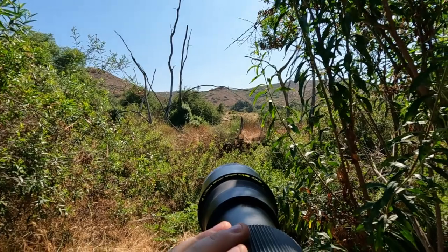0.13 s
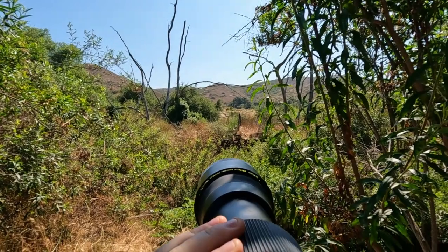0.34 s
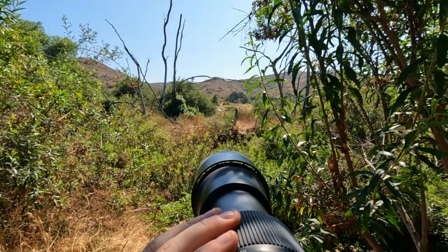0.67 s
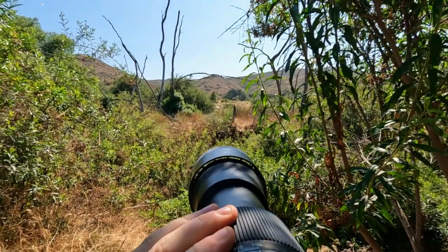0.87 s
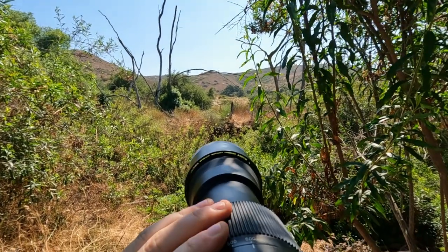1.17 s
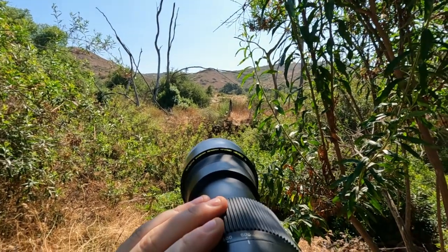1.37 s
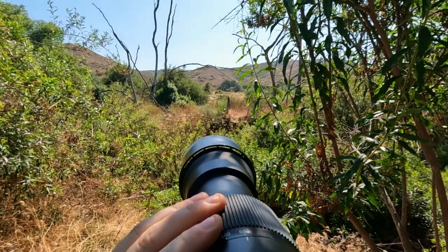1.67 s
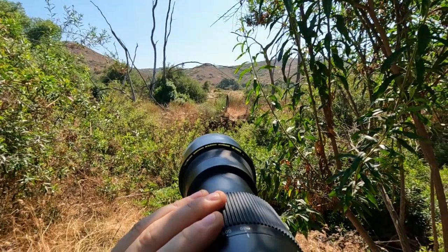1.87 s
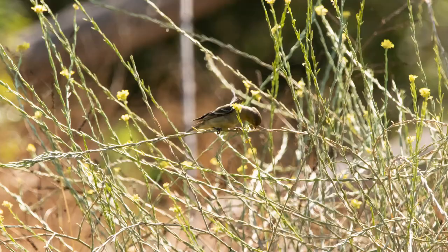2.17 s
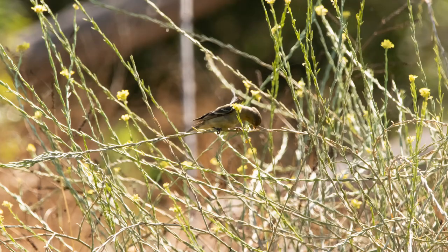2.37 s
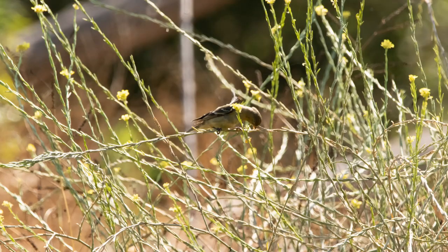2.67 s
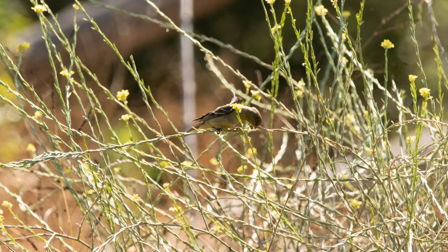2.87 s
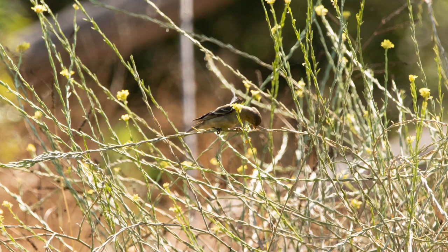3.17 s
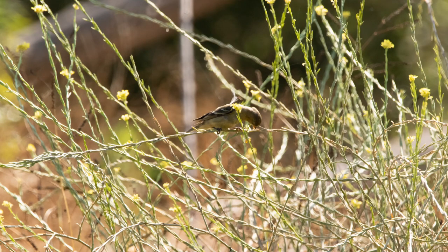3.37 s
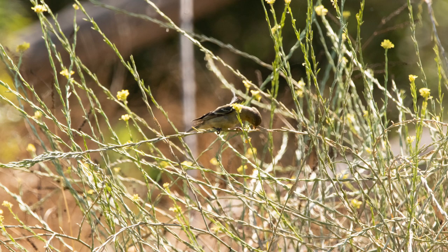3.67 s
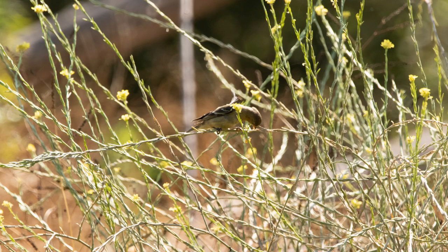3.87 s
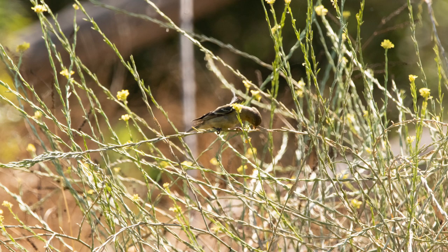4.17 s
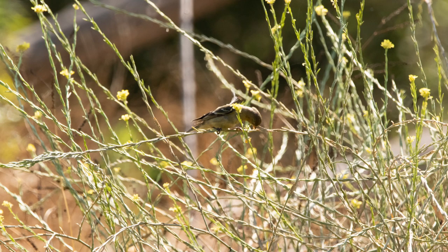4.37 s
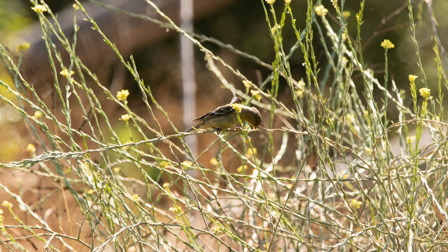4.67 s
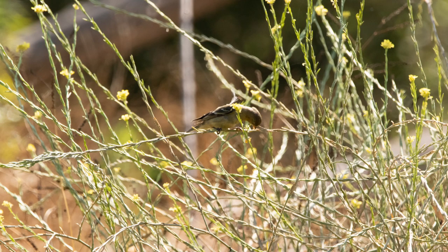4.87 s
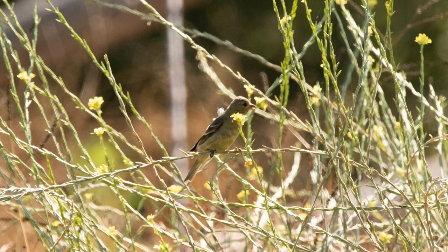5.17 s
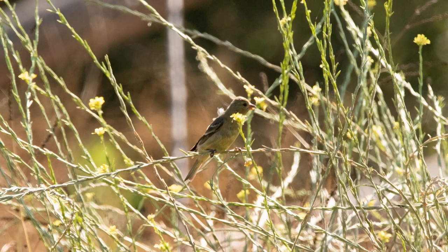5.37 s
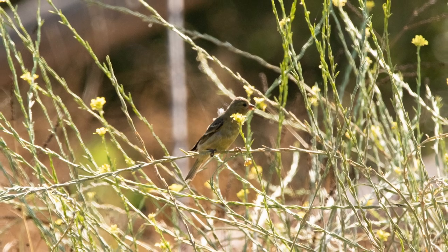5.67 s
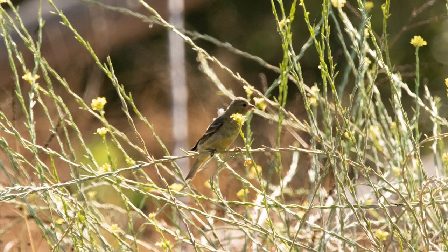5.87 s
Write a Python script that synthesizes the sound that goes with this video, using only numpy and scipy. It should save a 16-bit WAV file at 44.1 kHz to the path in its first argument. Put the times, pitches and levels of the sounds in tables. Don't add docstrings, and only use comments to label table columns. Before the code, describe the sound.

An open-air scene in dry scrub, heard from a small stereo microphone right beside a camera. Quiet low traffic rumble and wavering engine hum run throughout, with barely audible air and insect hiss. From 0 seconds small birds give harsh wheezes, falling whistles and chips at a distance, softened by the foliage. Fingers rub and tap the grip, with a firmer knock at 0.54 and tiny touches around 1.1 and 1.7. At 2.04 a button ticks, a latch snaps at 2.08, and from 2.12 to 2.25 the mirror, shutter blades and recocking gears clatter in a loud, tight metallic burst. The button returns softly at 2.6. Birds scold at 3.2 to 3.8 and one buzzes at 4.2. The second shot snaps at 4.81 and clatters from 4.88 to 5.02, followed by a small button click at 5.3 and more chirps until 6 seconds.

```python
import sys
import numpy as np
from scipy import signal
from scipy.fft import rfft, irfft
from scipy.io import wavfile

SR = 44100
rng = np.random.default_rng(int(sys.argv[2]) if len(sys.argv) > 2 else 0)


def store_wav(level_fs):
    pcm = np.round(np.clip(np.atleast_2d(level_fs), -1, 1) * 32767)
    wavfile.write(sys.argv[1], SR, pcm.T.astype(np.int16))


def elevation(decibels):
    levels = np.asarray(decibels, float)
    return 10 ** (levels / 20)


N = 265526

# t/s, peak level/dB
LATCH = [
    (2.0831, -10),
    (4.8143, -11.5),
]


def rms_one(x):
    return x / np.sqrt(np.mean(x ** 2) + 1e-20)


def in_time(rows):
    s, *columns = np.transpose(rows)
    return [np.interp(np.arange(N) / SR, s, c) for c in columns]


def at_hz(points, size):
    hz = np.maximum(np.arange(size // 2 + 1) * SR / size, 1)
    table_hz, value = np.array(points).T
    return np.interp(np.log(hz), np.log(table_hz), value)


def drift(rate_hz, size):
    r, run_in = np.exp(-2 * np.pi * rate_hz / SR), 8000
    noise = rng.standard_normal(size + run_in)
    return rms_one(signal.lfilter([1], [1, -2 * r, r * r], noise)[run_in:])


def pan(x, db):
    return x * elevation(np.array([db / 2, -db / 2])).reshape(2, -1)


def ring(x, hz, t60_s):
    r, w = elevation(-60 / (t60_s * SR)), 2 * np.pi * hz / SR
    return signal.lfilter([0, np.sin(w)], [1, -2 * r * np.cos(w), r * r], x + 1e-18)


def causal(points, size):
    cepstrum = irfft(np.log(elevation(np.maximum(at_hz(points, size), -80))), size)
    cepstrum[1:size // 2] *= 2
    cepstrum[size // 2:] = 0
    return irfft(np.exp(rfft(cepstrum)), size)[:size // 2]


def scrub(x, t60_s, wet_db):
    t = np.arange(round(.4 * SR)) / SR
    tail = rng.standard_normal((2, len(t))) * elevation(-60 * t / t60_s) * (t > .003)
    tail = elevation(wet_db) * tail / np.sqrt(np.sum(tail ** 2) / 2)
    return x + signal.fftconvolve(x * np.ones((2, 1)), tail, axes=1)[:, :N]


def far_noise(spectrum):
    # f/Hz, left-right likeness
    likeness = [(60, 0.97), (130, 0.98), (290, 0.91), (640, 0.6), (1410, 0.41), (3100, 0.17), (6820, 0.4),
                (15000, 0.76)]
    # f/Hz, left minus right level/dB
    lean = [(60, 1), (150, 0.5), (380, 0.5), (950, 4.5), (2380, 2), (5980, -0.5), (15000, 7)]
    alike = np.clip(at_hz(likeness, N), 0, 1)
    mid, side = rfft(rng.standard_normal((2, N))) * elevation(at_hz(spectrum, N))
    both = np.sqrt(1 + alike) * mid + np.sqrt(1 - alike) * side * [[1], [-1]]
    return rms_one(irfft(pan(both, at_hz(lean, N)), N))


def heavy_rumble():
    # t/s, level/dB, left minus right/dB
    swell = [(0.0, -39, -1.5), (0.3, -40.5, -4), (2.09, -39.5, 0.0), (2.43, -43, -3), (4.44, -40.5, -1.7),
             (5.75, -41, -1.5), (6.02, -37.5, -2.5)]
    # f/Hz, density/dB per Hz
    colour = [(7.1, -31.5), (12, -1), (38, 7.5), (54, 5), (92, -7), (130, -20), (170, -41), (290, -120)]
    level_db, lean_db = in_time(swell)
    return pan(elevation(level_db + 1.5 * drift(11.0, N)) * far_noise(colour), lean_db)


def traffic_noise():
    # f/Hz, density/dB per Hz
    colour = [(53, -34), (90, -1.5), (147, -6), (192, -8), (244, -6), (348, -15.5), (441, -16.5),
              (553, -20), (820, -26.5), (1040, -24.5), (1300, -25.5), (2050, -34.5), (2450, -44.5),
              (3380, -75.5), (5720, -120)]
    return elevation(-49.5) * far_noise(colour)


def insect_hiss():
    # f/Hz, density/dB per Hz
    colour = [(1290, -38), (2200, -11), (2910, -8), (3160, -4.5), (3410, -11), (3820, -9.5), (5020, -8.5),
              (6540, -8), (8300, -18), (9300, -12.5), (10300, -3.5), (11200, -15), (14100, -22.5),
              (15800, -37)]
    return elevation(-75.5 + .8 * drift(8, N)) * far_noise(colour)


def insects():
    # f/Hz, level/dB, t60/s
    singers = [(10700, -94, 0.024), (9490, -99, .03), (10600, -100, .03)]
    noise = rng.standard_normal((2, N))
    return sum(elevation(db) * rms_one(ring(noise, hz, t60_s)) for hz, db, t60_s in singers)


def tone(hz, db, wobble_db):
    level = elevation(db + wobble_db * drift(6.5, N))
    return np.sqrt(2) * level * np.sin(2 * np.pi * np.cumsum(hz) / SR)


def near_engine():
    # t/s, f/Hz, level/dB, second multiple/dB, third multiple/dB
    hum = [(0.0, 141.2, -50, -59, -63.5), (1.32, 145.8, -49, -74, -75), (5.58, 145.7, -50.5, -66.5, -66),
           (6.02, 143.3, -50.5, -83, -95)]
    hz, db, second_db, third_db = in_time(hum)
    return tone(hz, db, 2.0) + tone(2 * hz, second_db, 3.3) + tone(3 * hz, third_db, 1.2)


def passing_engine():
    # t/s, second multiple f/Hz, its level/dB, fundamental/dB, third multiple/dB
    drone = [(0.0, 239.9, -56, -77, -85), (0.75, 243.4, -65, -64, -85), (4.07, 242.5, -51, -49, -61),
             (6.02, 232.5, -55, -49, -73.5)]
    hz, db, first_db, third_db = in_time(drone)
    return tone(hz, db, 0.88) + tone(hz / 2, first_db, 1.9) + tone(hz * 3 / 2, third_db, 1.5)


def brief_engine():
    # t/s, f/Hz, level/dB
    whine = [
        (4.1, 259.5, -56),
        (4.696, 270.5, -53),
        (5.2, 261.2, -59.5),
    ]
    (first_s, first_hz, _), (last_s, last_hz, _) = whine[0], whine[-1]
    hz, db = in_time([(first_s - .2, first_hz, -90)] + whine + [(last_s + 0.18, last_hz, -90)])
    return tone(hz, db, 3.6)


def call_rows(rows, waver_hz, octaves_per_s=0):
    full = []
    for s, length_s, hz, *end, db in rows:
        end_hz = end[0] if end else hz * 2 ** (octaves_per_s * length_s)
        full.append((s, length_s, hz, end_hz, db, waver_hz))
    return full


def birds(rows, even, waver_rate_hz, throb_db, edge):
    out = np.zeros(N + SR)
    for s, length_s, start_hz, end_hz, db, waver_hz in rows:
        u = np.linspace(0, 1, round(length_s * SR))
        regular = np.sqrt(2) * np.sin(2 * np.pi * waver_rate_hz * length_s * u)
        chance = 2.1 * np.tanh(0.64 * drift(waver_rate_hz, len(u)))
        waver = even * regular + (1 - even) * chance
        hz = start_hz * (end_hz / start_hz) ** u + waver_hz * waver
        shape = np.sin(np.pi * u ** 0.69) ** edge * elevation(db + throb_db * drift(60, len(u)))
        at = round(s * SR)
        out[at:at + len(u)] += np.sqrt(2) * shape * np.sin(2 * np.pi * np.cumsum(hz) / SR)
    return out[:N]


def clear_notes():
    # t/s, length/s, start f/Hz, level/dB
    slurs = [(.10, .04, 8200, -72), (.168, 0.044, 5500, -66), (.335, 0.055, 8200, -75),
             (.392, .05, 5680, -66), (.415, 0.034, 3200, -68), (.875, 0.019, 5400, -71),
             (.975, 0.02, 5370, -69), (1.28, 0.027, 6000, -66.5), (2.36, 0.014, 4540, -70),
             (3.98, 0.039, 3790, -75.5)]
    # t/s, length/s, f/Hz, level/dB
    pipes = [(.78, 0.097, 6600, -83.5), (1.17, .04, 6100, -80), (1.4, 0.054, 6500, -79),
             (1.48, .05, 5150, -74), (2.93, .11, 6000, -81), (2.95, .089, 4790, -81),
             (4.61, .1, 6270, -81.5), (5.33, .04, 4480, -68), (5.37, .1, 4470, -76.5),
             (5.335, 0.04, 5720, -78), (5.44, .073, 5680, -76)]
    # t/s, length/s, start f/Hz, end f/Hz, level/dB
    bends = [(.345, .025, 2700, 3300, -74), (.755, .045, 5000, 5550, -81), (.8, .05, 5500, 5450, -82),
             (1.17, .1, 4850, 4200, -77), (1.335, .05, 4250, 5000, -68), (1.36, .05, 6100, 6550, -80),
             (1.38, .05, 5000, 5200, -69), (2.755, .05, 2250, 3100, -73), (2.905, .03, 3200, 3900, -73),
             (2.905, .045, 4200, 4800, -72), (2.935, .025, 3900, 3350, -72), (3.25, .13, 4830, 4380, -76),
             (5.34, .03, 4450, 3700, -71)]
    rows = call_rows(slurs, waver_hz=50.4, octaves_per_s=-8.5)
    rows += call_rows(pipes, waver_hz=35) + call_rows(bends, waver_hz=50)
    return birds(rows, even=0, waver_rate_hz=160, throb_db=4.5, edge=0.25)


def husky_chips():
    # t/s, length/s, f/Hz, level/dB
    chips = [(.335, 0.146, 3840, -66), (1.27, .047, 3110, -79), (1.37, .025, 3100, -80),
             (1.5, 0.053, 3120, -81), (1.94, .018, 4380, -81), (2.38, 0.05, 3770, -65.5),
             (2.43, .17, 3890, -77), (3.55, 0.032, 6500, -69), (3.685, .027, 5120, -62.5),
             (3.805, 0.017, 2950, -65), (4.035, 0.027, 3790, -73), (4.02, 0.1, 5100, -77),
             (5.1, 0.055, 4830, -71.5), (5.64, .12, 3650, -70)]
    return birds(call_rows(chips, waver_hz=150), even=0, waver_rate_hz=600, throb_db=4.0, edge=.35)


def harsh_calls():
    # t/s, length/s, f/Hz, level/dB
    chats = [(0.0, 0.21, 5950, -75), (.58, 0.1, 5140, -70), (1.255, 0.083, 4190, -65.5),
             (1.35, 0.072, 3980, -63.5), (1.49, 0.042, 3980, -63), (3.245, 0.076, 5130, -68.5),
             (3.34, 0.053, 4390, -63), (3.52, 0.082, 5190, -65), (3.65, 0.087, 4860, -63.5),
             (3.74, 0.038, 5500, -68.5), (4.58, 0.09, 6250, -74.5)]
    # t/s, length/s, start f/Hz, end f/Hz, level/dB
    wheezes = [(.02, 0.31, 4860, 4010, -69), (2.62, 0.024, 3020, 2730, -69.5),
               (2.69, 0.059, 3480, 4180, -74.5), (2.74, 0.23, 5090, 3610, -65.5),
               (4.2, .31, 5820, 5680, -75.5), (5.1, 0.24, 5300, 5870, -79), (5.2, 0.2, 3810, 4280, -71),
               (5.35, 0.105, 3950, 3770, -68), (5.5, .13, 3810, 4160, -67), (5.5, .18, 5350, 4990, -83),
               (5.62, .12, 4036, 3514, -64.5)]
    # t/s, length/s, f/Hz, level/dB
    croak = [(0.0, .087, 2035, -63)]
    rows = call_rows(chats, waver_hz=1090) + call_rows(wheezes, waver_hz=482) + call_rows(croak, waver_hz=300)
    return birds(rows, even=0, waver_rate_hz=1226, throb_db=2.5, edge=0.31)


def even_buzz():
    # t/s, length/s, start f/Hz, end f/Hz, level/dB
    buzz = [(4.185, 0.3, 4490, 4255, -62)]
    return birds(call_rows(buzz, waver_hz=567), even=.7, waver_rate_hz=240, throb_db=2.0, edge=.45)


def birds_in_scrub():
    song = clear_notes() + husky_chips() + harsh_calls() + even_buzz()
    return elevation(-1.5) * scrub(pan(song, 0.53), t60_s=0.33, wet_db=0.5)


def chatter(size, per_s, spread_db):
    sizes = elevation(spread_db * np.minimum(rng.exponential(1, size), 4)) * rng.choice([-1, 1], size)
    return rms_one(sizes * (rng.random(size) < per_s / SR))


def contacts(size, per_s, spread_db, apart):
    shared, own = chatter(size, per_s, spread_db), chatter(size, per_s, spread_db)
    return shared + apart * np.array([.7, 1.0, 1.1])[:, None, None] * np.outer([1, -1], own)


def each_shot(rows):
    shots = [
        2.182,
        4.9455,
    ]
    return [[(shot + s, *rest) for s, *rest in rows] for shot in shots]


def rattle(moves, per_s, low_db, high_db, apart):
    level = 0
    for rows in moves:
        start, end = (rows[0][0] - .001, -120), (rows[-1][0] + .01, -120)
        level = level + elevation(in_time([start] + rows + [end])[0])
    tilt = elevation(np.array([low_db, 0, high_db]))[:, None, None]
    return level * elevation(1.3 * drift(160, N)) * tilt * contacts(N, per_s, 3.8, apart)


def grip_rub():
    # t/s, swell/s, fade/s, top level/dB
    rubs = [(0.0, 0.0049, 0.18, -67.5), (0.372, 0.19, 0.058, -63.5), (1.071, 0.11, .05, -74.5),
            (1.66, 0.027, 0.12, -71.5)]
    edge_db = -17.5
    moves = [[(s, db + edge_db), (s + swell_s, db), (s + swell_s + fade_s, db + edge_db)]
             for s, swell_s, fade_s, db in rubs]
    return rattle(moves, per_s=2500, low_db=18.5, high_db=-3.5, apart=0.44)


def gear_train():
    gear_run = [(-.069, -66.5), (-.060, -35), (-.031, -32), (-.015, -44), (-.006, -48), (0.0, -31),
                (.028, -35.5), (.053, -29.5), (.088, -67)]
    return rattle(each_shot(gear_run), per_s=8200, low_db=-2.5, high_db=-4.5, apart=0.39)


def camera(knocks, trim_db, part_db, part_t60_s, rise_s, apart, first):
    t = np.arange(round(.08 * SR)) / SR
    drive = np.zeros((3, 2, N + SR))
    for s, db, low_db, high_db, t60_s, part_hz in knocks:
        range_db = np.array([[low_db + 18], [0], [high_db + 14]])
        range_t60_s = t60_s * np.array([[1.4], [1], [.8]])
        tilt = elevation(db + trim_db + range_db - 60 * t / range_t60_s)
        layers = contacts(len(t), 16000, 1.5, apart) * (tilt * (1 - np.exp(-t / rise_s)))[:, None]
        layers[:, :, 0] = first * tilt[:, :1]
        layers[1:] += elevation(part_db) * ring(layers[1], part_hz, part_t60_s)
        at = round(s * SR)
        drive[:, :, at:at + len(t)] += layers
    return drive[:, :, :N]


def grip_touches():
    # t/s, peak level/dB, lows re mid/dB, highs re mid/dB
    handling = [(0.1516, -37, -16, -10.5), (0.1756, -39, -6, -17), (0.39, -39, 5, 1.5),
                (0.431, -45, 1, 7.5), (0.4728, -52, 7, -8), (0.511, -35.5, -1, -8),
                (0.5433, -26, 0.5, -3.5), (0.565, -48, -4, -6), (0.59, -50.5, 9.5, -17),
                (0.9862, -57, 10, -19), (1.085, -59, 12, 10), (1.098, -59, 14, -12),
                (1.133, -58.5, 14.5, -4), (1.1645, -43.5, 6, 0.5), (1.192, -56.5, 13.5, -13),
                (1.203, -53, 10, -7), (1.4403, -54.5, 10.5, -10), (1.667, -60, 16, -15),
                (1.6752, -52, 15, 13.5), (1.698, -53, 10, 4), (1.7138, -59, 16, -15), (1.726, -52, -1, -4),
                (5.2071, -56, 10.5, -14), (5.69, -52.5, 6.5, -26)]
    grip_t60_s, grip_hz = 0.022, 1000
    knocks = [(*row, grip_t60_s, grip_hz) for row in handling]
    return camera(knocks, trim_db=-15.5, part_db=-27.0, part_t60_s=0.01, rise_s=0.00067, apart=0.3, first=2.4)


def button_knocks():
    # t/s, peak level/dB, lows re mid/dB, highs re mid/dB, ringing part f/Hz
    presses = [(2.042, -23.5, -14, -16.5, 2410), (2.596, -39.5, -1, -34, 2330),
               (5.308, -33.5, -5, -12, 2590)]
    t60_s = .016
    knocks = [(s, db, low_db, high_db, t60_s, hz) for s, db, low_db, high_db, hz in presses]
    return camera(knocks, trim_db=-10.5, part_db=-20.5, part_t60_s=0.0061, rise_s=.0002, apart=.25, first=2.5)


def latch_knocks():
    snap_sound, bounce_sound = (-19, -11, 0.0151, 5250), (-12, -25, .028, 3000)
    pawl_lead_s, pawl_db = .0104, -45
    bounce_delay_s, bounce_db = .004, -19
    knocks = []
    for s, db in LATCH:
        knocks.append((s - pawl_lead_s, pawl_db, *snap_sound))
        knocks.append((s, db, *snap_sound))
        knocks.append((s + bounce_delay_s, db + bounce_db, *bounce_sound))
    return camera(knocks, trim_db=-14.5, part_db=-20, part_t60_s=0.0038, rise_s=.0001, apart=.25, first=.1)


def cycle_knocks():
    # t/s, peak level/dB, highs re mid/dB, chatter t60/s, ringing part f/Hz
    first_shot = [(2.1172, -11.5, -20, 0.024, 2100), (2.1235, -15, -8, 0.033, 2200),
                  (2.138, -20, -10, 0.031, 3200), (2.1488, -10, -8, .025, 3310),
                  (2.158, -18, -10, 0.026, 2300), (2.178, -21, -3, 0.067, 7000),
                  (2.183, -6.5, -5, 0.019, 2100), (2.188, -15, -12, .012, 2100),
                  (2.194, -15, -9, 0.017, 3700), (2.2, -17, -8, 0.023, 4300),
                  (2.2121, -10, -6.5, 0.029, 3750), (2.219, -12, -8.5, 0.02, 2000),
                  (2.2262, -15, -8, .025, 3000), (2.234, -18.5, -8, 0.022, 6900),
                  (2.243, -20.5, -14, .02, 1830), (2.249, -24, -22.5, 0.041, 2400)]
    second_shot = [(4.884, -23, -11, .04, 3350), (4.889, -15, -10, .02, 3420), (4.899, -19, -12, .03, 3300),
                   (4.9127, -10.5, -10, .022, 3400), (4.92, -16, -8, 0.027, 2290),
                   (4.929, -22.5, -10.5, 0.0097, 1900), (4.941, -22, -3, .06, 7100),
                   (4.946, -7.5, -4.5, .018, 2194), (4.957, -14, -8, .018, 3700),
                   (4.963, -18, -8, .025, 4300), (4.9753, -11, -7, .035, 3410),
                   (4.9813, -13, -5.5, 0.018, 6870), (4.99, -13.5, -10, .025, 3300),
                   (4.996, -15, -12, .018, 3400), (5.004, -19.5, -14, .025, 2200),
                   (5.012, -23.5, -18.5, .025, 2400)]
    low_db = -20.5
    knocks = [(s, db, low_db, *rest) for s, db, *rest in first_shot + second_shot]
    return camera(knocks, trim_db=-10.5, part_db=-23.5, part_t60_s=0.009, rise_s=0.0006, apart=.2, first=.1)


def strikes():
    # t/s, peak level/dB, ringing part f/Hz
    hits = [(2.1504, -12.5, 3300), (2.1837, -9, 6900), (2.1853, -9.5, 2100), (2.2133, -11.5, 3730),
            (2.2211, -10, 6700), (4.9142, -14, 7000), (4.9468, -10, 7000), (4.9486, -11, 2193),
            (4.9764, -10, 3500), (4.978, -13.5, 6870), (4.9932, -14, 3300)]
    trim_db, ring_db, t60_s = -.5, -17, 0.0056
    out, t = np.zeros(N), np.arange(round(.02 * SR)) / SR
    for s, db, hz in hits:
        click = t == 0
        part = elevation(ring_db - 60 * t / t60_s) * np.sin(2 * np.pi * hz * t) + click
        at = round(s * SR)
        out[at:at + len(t)] += elevation(db + trim_db) * part
    return out * elevation(np.array([-3.0, 0, .3]))[:, None, None]


def snaps():
    clicks = np.zeros(N)
    for s, db in LATCH:
        clicks[round((s + .0004) * SR)] = elevation(db - 3)
    return ring(clicks, 5300, .005) - .45 * ring(clicks, 1600, .012)


def thumps():
    stops = [(-.032, -26.5, 398.6), (-.027, -30.5, 900), (0.0, -23, 453.3), (.002, -24, 980),
             (.012, -30, 950), (.030, -31.5, 600), (.048, -33, 950)]
    # t/s, peak level/dB, f/Hz
    grip_thump = [(0.543, -35.5, 260)]
    out, push = np.zeros(N), np.hanning(40) / 20
    for s, db, hz in sum(each_shot(stops), grip_thump):
        clicks, at = np.zeros(N), round(s * SR)
        clicks[at:at + len(push)] = elevation(db + 3.5) * push
        out += ring(clicks, hz, t60_s=0.019)
    return out


def spring_rings(gears):
    # f/Hz, level/dB, t60/s
    springs = [(2950, -64, .35), (4970, -65, .3), (2620, -70, .3), (3900, -68, .3), (6000, -73, .2)]
    return sum(elevation(db) * ring(gears[1, 0], hz, t60_s) for hz, db, t60_s in springs)


def body_response(ring_db):
    # f/Hz, width/Hz, level/dB
    resonances = [(1060, 82, -2.5), (1190, 100, -12), (2120, 190, 2.5), (2610, 930, 2), (2730, 72, -7),
                  (3300, 67, -11), (3820, 41, -17), (4600, 49, -18), (6700, 190, -19.5), (7200, 210, -11.5),
                  (8620, 230, -28.5), (9700, 150, -9.5)]
    # f/Hz, density/dB per Hz
    shell = [(330, -36), (560, -5), (840, -9), (980, -1.5), (1370, -2.5), (2090, -5.5), (2340, -0.5),
             (3410, -1.5), (5640, -7.5), (7160, -8), (8010, -14.5), (12400, -27.5), (15900, -48)]
    # f/Hz, left minus right level/dB
    body_lean = [(60, -0.5), (130, -0.5), (290, 0.0), (640, 0.0), (1410, 1.5), (3100, -1.5), (6820, 0.5),
                 (15000, 2.0)]
    t, rings = np.arange(2048) / SR, 0
    for hz, width_hz, db in resonances:
        decay = np.exp(-np.pi * width_hz * t)
        rings = rings + elevation(db) * np.sqrt(width_hz / 100) * decay * np.sin(2 * np.pi * hz * t)
    response = rms_one(causal(shell, size=4096)) + elevation(ring_db) * rms_one(rings)
    port_colours = [causal(np.array(body_lean) * [1, side / 2], size=256) for side in (1, -1)]
    return signal.fftconvolve(response[None], port_colours, axes=1)


def ports(x):
    port_db, top_db, t60_s = -13, -34, .02
    mono = x.mean(axis=0)
    paths = rng.standard_normal(600) * elevation(-60 * np.arange(600) / SR / t60_s)
    paths = elevation(port_db) * paths / np.sqrt(np.sum(paths ** 2))
    top = elevation(top_db) * np.convolve(mono, [1, -4, 6, -4, 1], "same")
    return x + np.outer([1, -1], signal.fftconvolve(mono, paths)[:N] + top)


def body(drive, gears):
    low = signal.sosfilt(signal.butter(4, 1350, "low", fs=SR, output="sos"), drive[0])
    mid = signal.sosfilt(signal.butter(2, [1400, 5500], "band", fs=SR, output="sos"), drive[1])
    high = signal.sosfilt(signal.butter(2, 5500, "high", fs=SR, output="sos"), drive[2])
    response = body_response(ring_db=-4.0) / 45
    knocks = signal.fftconvolve(low - mid + high, response, axes=1)[:, :N]
    return scrub(ports(knocks + snaps()) + spring_rings(gears) + thumps(), t60_s=0.19, wet_db=-28)


def scene():
    background = heavy_rumble() + traffic_noise() + insect_hiss() + insects()
    engines = near_engine() + passing_engine() + brief_engine()
    gears = gear_train()
    handling = grip_rub() + grip_touches() + button_knocks()
    shutter = latch_knocks() + cycle_knocks() + strikes() + gears
    return background + engines + birds_in_scrub() + body(handling + shutter, gears)


def low_pass(x):
    return signal.sosfilt(signal.butter(12, 16130, fs=SR, output="sos"), x)


def record(dry):
    ceiling = .8
    rounded = ceiling * np.tanh(dry / ceiling)
    dulled = signal.sosfilt(signal.butter(3, 14300, "low", fs=SR, output="sos"), rounded)
    mix = signal.sosfilt(signal.cheby2(12, 70, 16400, fs=SR, output="sos"), dulled)
    return low_pass(mix)


dry = scene()
out = record(dry)
store_wav(out)
```